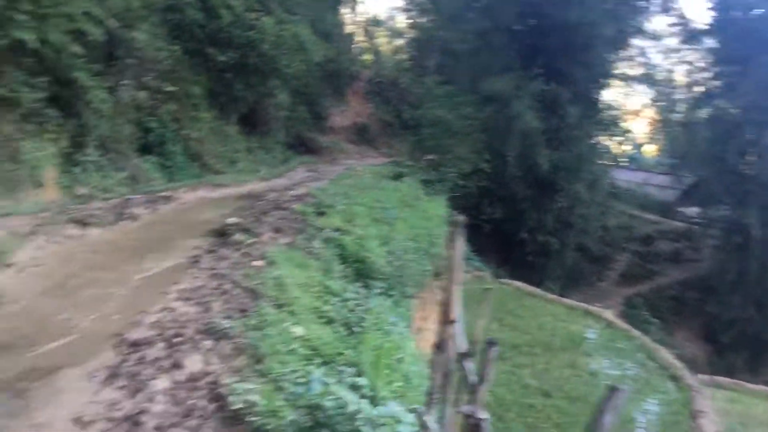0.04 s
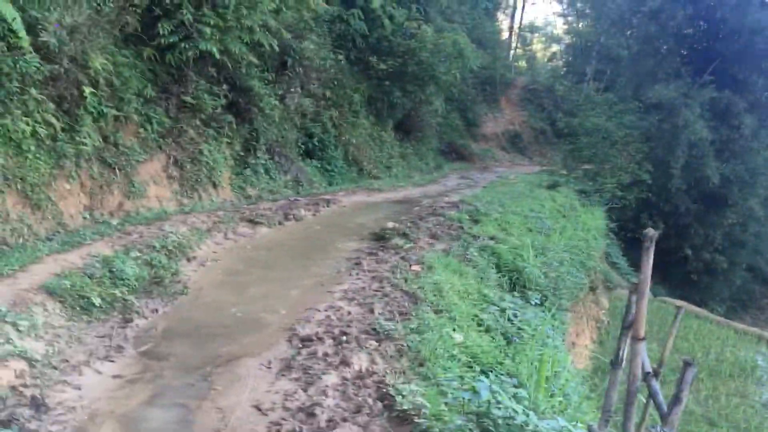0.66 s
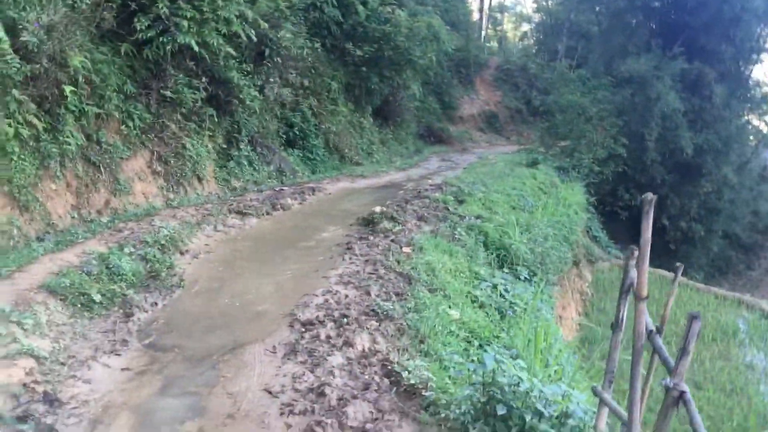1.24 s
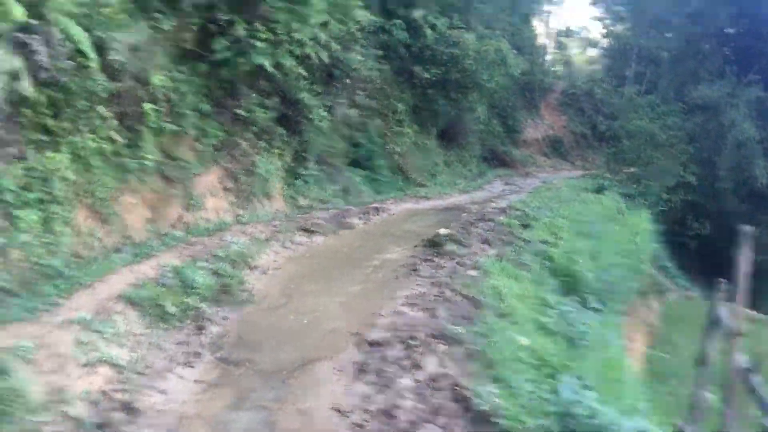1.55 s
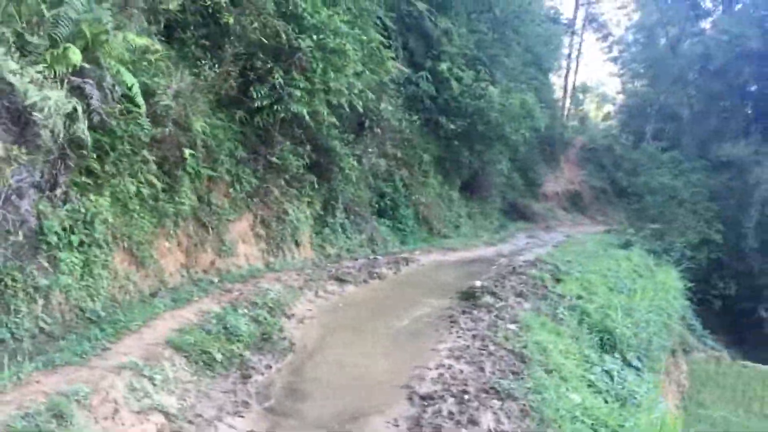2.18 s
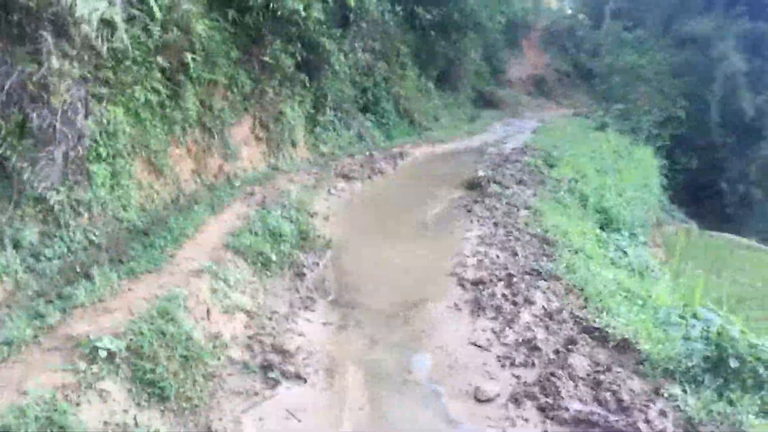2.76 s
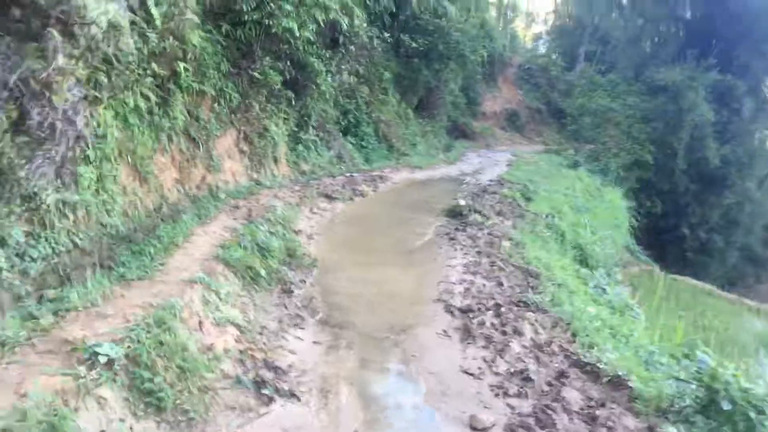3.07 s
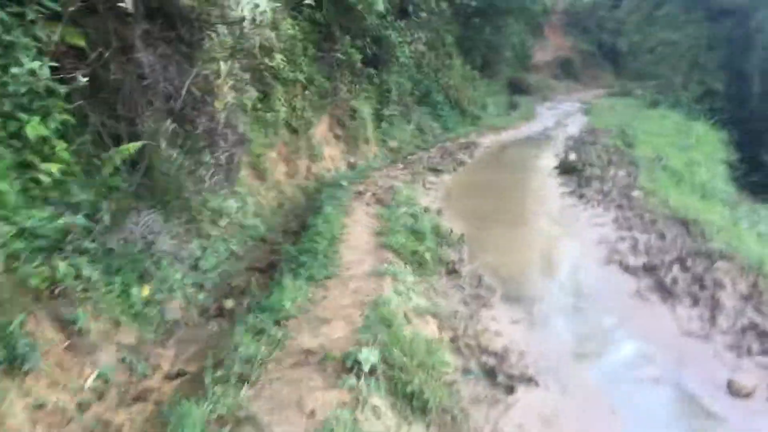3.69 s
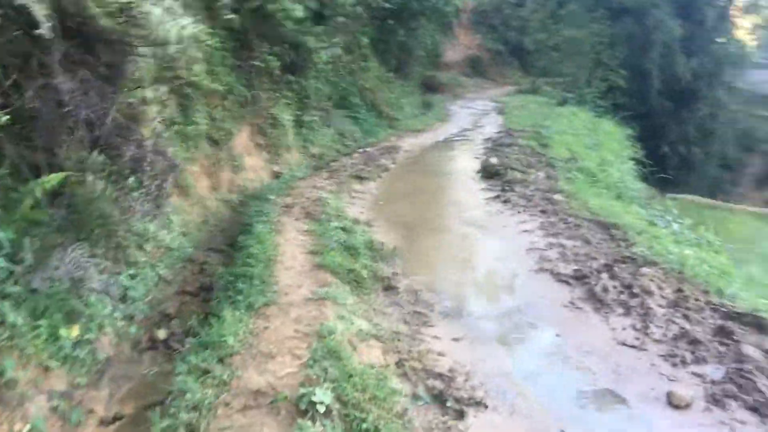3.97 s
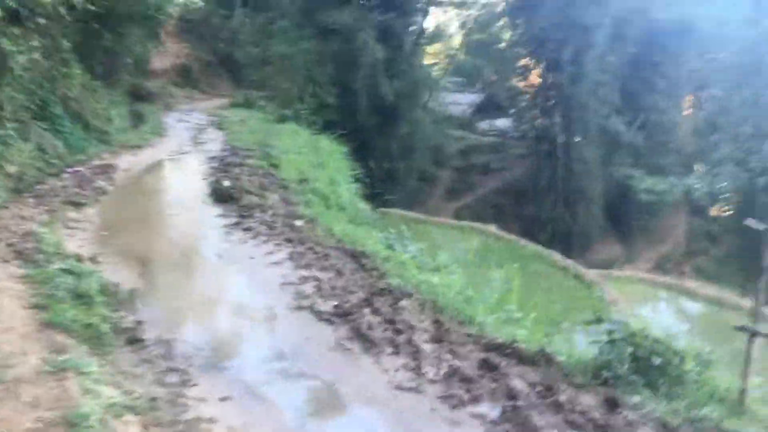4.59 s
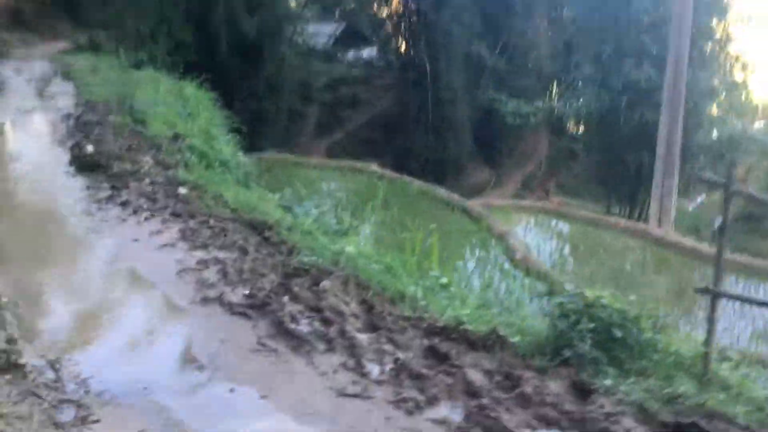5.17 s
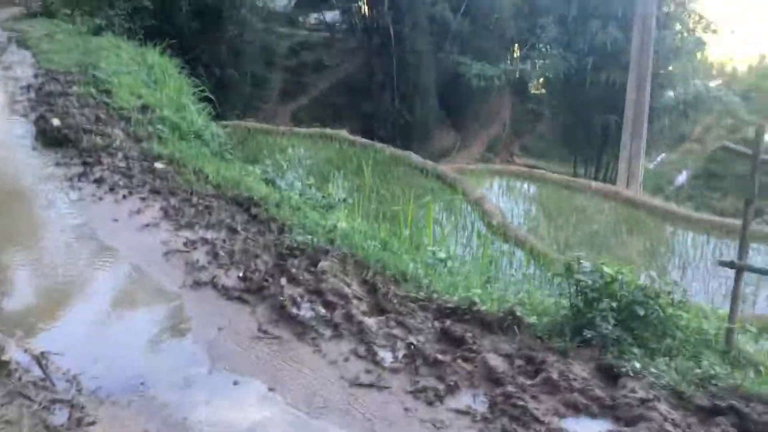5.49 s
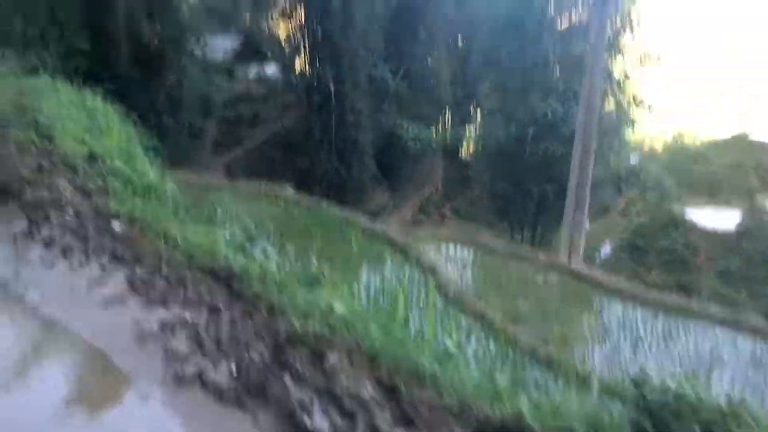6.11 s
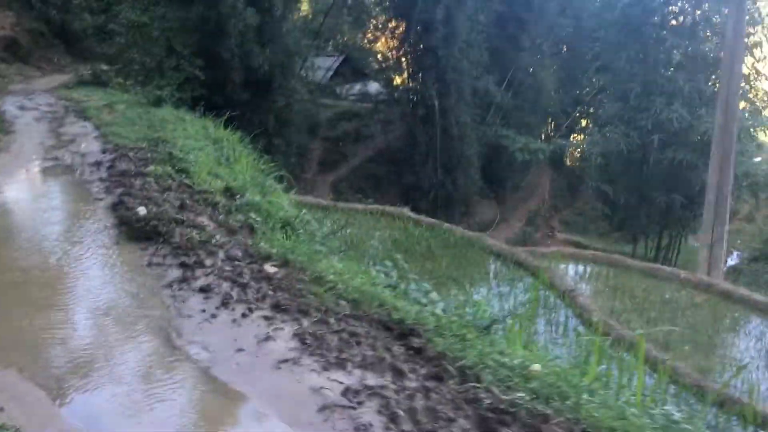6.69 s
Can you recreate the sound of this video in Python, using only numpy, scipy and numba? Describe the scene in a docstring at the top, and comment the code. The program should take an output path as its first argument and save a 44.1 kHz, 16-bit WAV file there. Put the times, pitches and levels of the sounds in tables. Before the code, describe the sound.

A small motorbike passes close at low revs and putters into the distance, while insects sing and feet shift on grass and mud.

```python
"""A single-cylinder four-stroke motorbike passes close on a muddy hillside track, its wet tyres hissing.
Each firing rings the silencer and shakes the engine. As the bike chugs away at low revs, someone by
the track shifts on grass and mud. Then crickets join in, and the slope ahead returns an echo that
comes sooner as the bike rides towards it. Near the end, soft ground hollows out the engine's sound.
All along, far insects sing over trickling water and a breeze puffs on the microphone."""
import sys
import numpy as np
from scipy import signal
from scipy.fft import rfft, irfft, next_fast_len
from scipy.io import wavfile
from scipy.ndimage import uniform_filter1d
from numba import njit

SR = 44100
rng = np.random.default_rng(int(sys.argv[2]) if len(sys.argv) > 2 else 0)


def put_to_file(sound):
    """Save the sound as 16-bit audio at rate SR, in the file named by the first command-line argument."""
    columns = np.atleast_2d(sound).T  # one column per channel
    safe = np.clip(columns, -1, 1)
    whole_steps = np.round(safe * 32767)
    wavfile.write(sys.argv[1], SR, whole_steps.astype(np.int16))


N = 302085
TIME = np.arange(N) / SR

# How fast the engine runs. Each row: time in seconds, firings per second.
FIRING_RATE = [(0.0, 21.17), (0.33, 24.15), (0.6, 24.41), (1.0, 25.19), (1.3, 24.06), (1.55, 24.35),
               (1.8, 22.78), (2.7, 21.04), (3.05, 20.97), (3.65, 21.28), (4.15, 21.07), (4.7, 20.76),
               (5.1, 21.1), (5.5, 22.05), (5.85, 22.93), (6.15, 24.36), (6.55, 23.99), (6.85, 23.97)]
# How loud the exhaust is. Each row: time in seconds, silencer's boom in dB, pipe's bark in dB.
EXHAUST_LEVELS = [(0, -20.5, -32.5), (.3, -20.5, -41.5), (.75, -20.5, -48), (.95, -20, -38.5),
                  (1.5, -21.5, -35.5), (1.95, -24, -42.5), (2.35, -25.5, -45.5), (2.8, -26.5, -45),
                  (3.05, -30.5, -44), (3.35, -31, -42), (3.7, -33.5, -46), (4.1, -30.5, -48),
                  (4.9, -33.5, -48), (5.4, -37, -43), (5.85, -36, -45.5), (6.05, -30, -42.5),
                  (6.5, -30.5, -47.5), (6.85, -36.5, -49.5)]
# Where the silencer's boom is centred. Each row: time in seconds, pitch in Hz.
BOOM_PITCH = [(0, 116), (.8, 126.5), (1.15, 107.6), (2.25, 122), (2.65, 127), (3.35, 127), (4.1, 86),
              (4.9, 98), (5.7, 98.7), (6.15, 122), (6.85, 130)]
# The tone of the engine's clatter. Each row: frequency in Hz, relative level in dB.
CLATTER_TONE = [(120, -4), (250, -5), (380, 10), (520, -2), (700, 0.5), (1000, -4.5), (1200, -5),
                (1800, -3), (2600, -7), (4000, -14), (5000, -17.5), (7000, -17), (10500, -24.5),
                (15000, -24)]
# The notes of the crankcase and cooling fins. Each row: pitch in Hz, width in Hz, relative level in dB.
CASING_NOTES = [(535, 10, 0.5), (848, 30, 1), (960, 37, 0), (1613, 120, -2.5), (2010, 17, -1),
                (2940, 8.2, -8), (3430, 48, -1), (4000, 190, -2), (5380, 350, -7.5)]
# Moments when the casing sings out. Each row: peak time in seconds, fade in seconds, pitch in Hz,
# level in dB.
CASING_SWELLS = [(0.342, 0.085, 814, -43), (0.423, .1, 2010, -45), (.73, 0.012, 4000, -45),
                 (3.48, 0.084, 855, -57), (3.647, 0.15, 1010, -63), (4.853, 0.42, 1027, -64),
                 (5.34, 0.26, 958, -61.5), (6.25, 0.18, 2010, -65)]
# Twigs, wet grit and soft knocks underfoot. Each row: start in seconds, level in dB, pitch in Hz,
# width in Hz, seconds to fade by 60 dB.
FOOT_CRACKS = [(1.654, -42.5, 5800, 7000, 0.015), (1.682, -51, 5200, 3500, 0.019),
               (2.4034, -43.5, 3240, 1580, 0.022), (2.511, -51, 418, 203, 0.019),
               (2.577, -52, 1290, 900, 0.031), (2.754, -56, 4500, 5000, .02),
               (4.299, -45, 1770, 1170, 0.034), (4.339, -51, 2590, 3500, 0.028),
               (4.519, -57, 5600, 2200, .02), (4.582, -50, 406, 220, 0.032),
               (4.5863, -52, 4480, 3500, 0.0086), (4.89, -54, 4000, 5000, 0.017),
               (4.945, -62, 11500, 2800, .03), (5.6923, -41.5, 2350, 1900, 0.0074),
               (5.7406, -52, 2200, 1300, 0.077), (5.835, -51.5, 4000, 5000, 0.018)]
# Grass and clothes brushing. Each row: peak time in seconds, level in dB, rise and fade in seconds.
BRUSHES = [(1.67, -49, 0.022, 0.016), (1.88, -55.5, 0.071, 0.08), (2.41, -49, 0.0094, 0.017),
           (2.45, -57.5, 0.022, 0.074), (3.02, -64.5, 0.077, 0.25), (3.27, -55, 0.013, 0.076),
           (3.43, -57, 0.021, 0.034), (3.6, -59, 0.065, 0.07), (4.32, -57.5, 0.043, 0.044),
           (5.03, -52.5, 0.053, 0.075), (5.705, -55, 0.043, 0.036), (5.84, -65, .015, 0.022),
           (6.32, -51, 0.025, 0.066)]
# The tone of that brushing. Each row: frequency in Hz, relative level in dB.
BRUSH_TONE = [(400, -3), (1200, 15.5), (4000, 10.5), (7000, 9), (10000, 5.5), (13000, 4.5), (16000, 4.5)]
# An insect's short buzzes. Each row: start in seconds, length in seconds, level in dB.
INSECT_BUZZES = [(3.988, 0.12, -67), (5.87, 0.18, -70), (6.44, .18, -69)]
# The tone of the forest and trickling water. Each row: frequency in Hz, relative level in dB.
FOREST_TONE = [(30, -2), (70, 20), (150, 13), (300, 4), (450, -5), (560, 0.5), (700, -1.5), (970, 3),
               (1250, -2.5), (1600, -4.5), (2700, -16), (3700, -5.5), (5200, -17.5), (7600, -10.5),
               (10500, -23.5), (15500, -24)]
# Puffs of air on the microphone. Each row: peak time in seconds, fade in seconds, level in dB.
AIR_PUFFS = [(1.0, .4, -35), (2.354, 0.045, -35), (2.574, .05, -47), (3.3, 0.67, -44), (6.097, 0.3, -48)]

PASSES_S, SPEED_M_S, MISS_M = 0.21, 1.83, 2.35  # when, how fast and how close the bike goes by
IDLE_FIRINGS_PER_S = 21


def engine_cycle():
    """A running count of four-stroke cycles; the engine fires near each whole number."""
    return np.cumsum(curves(FIRING_RATE)[0]) / SR - .12


def above_idle():
    """How many more firings per second the engine makes than at idle."""
    return curves(FIRING_RATE)[0] - IDLE_FIRINGS_PER_S


def nearness():
    """Closest distance over present distance: 1 side-on, falling as the bike rides off."""
    return MISS_M / np.hypot(MISS_M, SPEED_M_S * (TIME - PASSES_S))


def exhaust(cycle, scatter_db=1.01, bark_lead_s=0.0026, bark_echo_db=-10):
    """Each firing's puff of gas makes the pipe bark, the silencer boom and the air thump."""
    boom_db, bark_db = curves(EXHAUST_LEVELS)
    fired = np.flatnonzero(np.diff(np.floor(cycle + 1 / 13)))  # the exhaust valve opens once a cycle
    puffs = np.zeros(N)
    puffs[fired] = undb(scatter_db * rng.standard_normal(len(fired)))
    puffs = cut(puffs, 343.4, "low", order=9)  # the silencer swallows the treble
    echo = slope_echo(puffs)
    boom_width_hz = 42 + 25.5 * nearness()  # the putts are tighter close by
    boom = glide(puffs + echo, curves(BOOM_PITCH)[0], boom_width_hz)
    boom = cut(ring(boom, 109.3, 110), 158, "low", order=2)  # the broad band the silencer lets through
    boom = boom - ring(boom, 180.3, 39.4) - ring(boom, 64.8, 7.2)  # two narrow dips hollow the boom
    # the first rush of gas barks just before the boom; the grassy slope returns less of it
    rush = np.interp(TIME + bark_lead_s, TIME, puffs + undb(bark_echo_db) * echo)
    bark_hz = 262 + 8 * above_idle()
    bark = glide(rush, bark_hz, 0.33 * bark_hz)
    bark = cut(glide(bark, bark_hz + 12, 0.78 * bark_hz), 185, "high", order=4)
    facing = swell(-0.34, np.inf, 0.63, 1)  # the pipe's mouth turns to the listener
    thump_gain = undb(-35 + 1.46 * above_idle()) * facing * nearness() ** 1.23
    thump = thump_gain * steady(double_ring(puffs, 46.9, 22), cycle)
    return undb(boom_db) * steady(boom, cycle) + undb(bark_db) * steady(bark, cycle) - thump


def clatter(cycle, shift_cycles=.05, knock_cycles=.16, tick_cycles=0.031):
    """A knock and a valve tick at each firing, and the churn of chain and tyres, ring the crankcase."""
    behind = 1 - nearness() ** 2
    direct = nearness() * undb(-37 - 22.5 * behind)  # the engine is screened from behind
    gain = np.hypot(direct, undb(-59)) * undb(0.7543 * above_idle())  # trees scatter a little back
    # metal is struck at about the moment of each firing
    since_hit = (cycle + shift_cycles + 1 / 2) % 1 - 1 / 2
    knock = np.exp(-np.abs(since_hit - .03) / knock_cycles) * undb(3 * wander(24))
    churn = undb(5 - 6.5 * swell(PASSES_S, np.inf, 0.4, 1))  # softer once the bike has passed
    shaking = noise() * (knock + churn) * undb(wander(700))
    tick_db = 8.5 + 3 * wander(24)
    tick = noise() * (since_hit > 0) * np.exp(-np.abs(since_hit) / tick_cycles) * undb(tick_db)
    strikes = shaking + 5.3 * tick  # the valve hits metal directly, so it is heard mostly as ringing
    metal = sum(undb(db + 2 * wander(5.3)) * ring(strikes, hz, width) for hz, width, db in CASING_NOTES)
    return gain * steady(colour(shaking + 0.16 * tick + metal, CLATTER_TONE), cycle)


def singing_casing(cycle, depth=0.19):
    """Single notes of the engine's casing stand out for a moment, throbbing with the firings."""
    throb = 1 + depth * np.cos(2 * np.pi * (cycle - .12))
    return throb * sum(undb(db) * bump(peak, fade) * unit(double_ring(noise(), hz, 0.063 * hz))
                       for peak, fade, hz, db in CASING_SWELLS)


def tyre_spray(start_db=-45, fade_db_per_s=13.5):
    """Water and mud fizz off the tyres, fading as they leave the puddle behind."""
    drops = noise() * undb(1.5 * wander(900))
    return undb(start_db - fade_db_per_s * TIME) * unit(ring(drops, 4500, 8400))


def slope_echo(x, full_db=-4.8, midway_s=2.8, rise_s=.45):
    """The slope ahead repeats the sound, sooner and stronger as the bike rides towards it."""
    lag_s = .1398 - .005 * TIME
    gain = undb(full_db) / (1 + np.exp((midway_s - TIME) / rise_s))
    return gain * np.interp(TIME - lag_s, TIME, x)


def soft_ground(x, start_s=4.6, rise_s=0.67):
    """Far down the track, the bounce off grass and mud cancels a band of the engine's sound."""
    return x - swell(start_s, np.inf, rise_s, 1) * ring(x, hz=404, width_hz=190)


def hillside(x, fade_s=0.24, tail_db=-21):
    """Trees and slopes scatter the sound, adding a thin, dull tail."""
    t = TIME[:SR]
    tail = cut(rng.standard_normal(SR), 2100, "low", order=1) * undb(-60 * t / fade_s) * (t > .02)
    return x + undb(tail_db) * signal.fftconvolve(x, tail / np.sqrt(np.sum(tail ** 2)))[:N]


def underfoot():
    """Shifting feet crack twigs and grit, while grass and cloth give grainy brushes."""
    cracks = np.zeros(N)
    t = TIME[:SR // 10]
    for start_s, db, hz, width, fade in FOOT_CRACKS:
        crack = double_ring(rng.standard_normal(len(t)) * undb(-60 * t / fade), hz, width)
        start = int(start_s * SR)
        cracks[start:start + len(t)] += undb(db) * crack / np.std(crack[:SR // 250])
    brushing = sum(undb(db) * np.exp(-np.maximum((peak - TIME) / rise, (TIME - peak) / fade))
                   for peak, db, rise, fade in BRUSHES)
    grains = noise() * undb(1.5 * wander(600))
    return cracks + brushing * colour(grains, BRUSH_TONE)


def insects():
    """A far chorus, a cricket's swelling trill, a lower cricket's chirps and a few short buzzes."""
    chorus = undb(-66 + 0.33 * wander(5.1) + 0.98 * wander(60)) * unit(double_ring(noise(), 6720, 600))
    trill = wing_strokes(50 * TIME + 0.069 * wander(9), hz=7000, fall_hz=750, sounding_share=0.91)
    trill = undb(-60) * swell(2.78, 3.69, 0.73, 0.054) * unit(trill)
    stroke = 49 * TIME + .2 * wander(3.8)
    paired = 1 - .85 * (np.floor(stroke) % 3 == 2)  # every third stroke is weak
    effort = undb(-76) + undb(-73) * swell(2.6, 5.3, 0.32, 0.32)  # always soft, louder for a while
    effort *= undb(1.4 * wander(6.7))
    chirps = effort * unit(paired * wing_strokes(stroke, hz=4100, fall_hz=420, sounding_share=0.71))
    buzzing = sum(undb(db) * (TIME > start) * (TIME < start + length)
                  for start, length, db in INSECT_BUZZES)
    buzzes = uniform_filter1d(buzzing, size=800) * unit(double_ring(noise(), 6380, 200))
    return chorus + trill + chirps + buzzes


def wing_strokes(stroke, hz, fall_hz, sounding_share):
    """Each scrape of a cricket's wing is a short tone that sinks as the wing slows."""
    along = np.minimum(stroke % 1 / sounding_share, 1)
    pitch = hz - fall_hz * (along - 1 / 2) + 70 * wander(400)
    return np.sin(np.pi * along) * np.sin(2 * np.pi * np.cumsum(pitch) / SR)


def forest(level_db=-53):
    """Far water and leaves: the trickle flickers, the high hiss stays nearly even."""
    wash = colour(noise(), FOREST_TONE)
    trickle = cut(wash, 1000, "low", order=1)
    hiss = wash - trickle
    return undb(level_db) * (trickle * undb(1.3 * wander(14)) + hiss * undb(.6 * wander(14)))


def breeze(calm_db=-51.5):
    """Air pushing on the microphone makes a soft, uneven rumble."""
    air = undb(calm_db) + sum(undb(db) * bump(peak, fade) for peak, fade, db in AIR_PUFFS)
    flutter = undb(1.5 * wander(12))
    return air * flutter * unit(cut(double_ring(noise(), 50, 54), 28, "high", order=4))


def undb(db):
    """Turn decibels into a number to multiply by."""
    return 10 ** (np.asarray(db) / 20)


def curves(table):
    """The columns of a table, joined by straight lines in time."""
    times, *columns = np.transpose(table)
    return [np.interp(TIME, times, column) for column in columns]


def swell(start_s, end_s, rise_s, fall_s):
    """Rise from 0 to 1, hold and fall back between two times."""
    return np.clip(np.minimum((TIME - start_s) / rise_s, (end_s - TIME) / fall_s), 0, 1)


def bump(peak_s, fade_s):
    """A smooth hill of height 1, down to about a third at fade_s either side."""
    return np.exp(-((TIME - peak_s) / fade_s) ** 2)


def unit(x):
    """Scale a sound to an average strength (rms) of 1."""
    return x / np.sqrt(np.mean(x ** 2))


def steady(x, cycle):
    """Hold a pulsing sound near strength 1, averaged over three engine cycles."""
    count = cycle - np.floor(cycle[0])
    turn = count.astype(int)
    power = np.bincount(turn, x ** 2) / np.bincount(turn)
    power = uniform_filter1d(power[1:-1], size=3, mode="nearest")
    return x / np.sqrt(np.interp(count, np.arange(len(power)) + 3 / 2, power))


def noise():
    """White noise: an even hiss."""
    return rng.standard_normal(N)


def wander(per_second):
    """A smooth random drift, straying roughly 1 either side of zero."""
    hold = int(SR / per_second)
    steps = np.repeat(rng.standard_normal(N // hold + 1), hold)
    return 1.8 * uniform_filter1d(uniform_filter1d(steps, hold), hold)[:N]


def ring(x, hz, width_hz):
    """A resonance: it keeps one pitch at full strength and weakens those around it."""
    return signal.lfilter(*signal.iirpeak(hz, hz / width_hz, fs=SR), x)


def double_ring(x, hz, width_hz):
    """The same resonance twice, for a sharper band."""
    return ring(ring(x, hz, width_hz), hz, width_hz)


@njit
def glide(x, hz, width_hz):
    """A resonance whose pitch and width can move."""
    y, band, low = np.empty(len(x)), 0., 0.
    for i in range(len(x)):
        tuning, damping = np.tan(np.pi * hz[i] / SR), width_hz[i] / hz[i]
        swing = (band + tuning * (x[i] + 1e-18 - low)) / (1 + tuning * (tuning + damping))
        band, low = 2 * swing - band, low + 2 * tuning * swing
        y[i] = damping * swing
    return y


def cut(x, hz, keep, order):
    """Keep the "low" or "high" side of hz; a higher order cuts more steeply."""
    return signal.sosfilt(signal.butter(order, hz, keep, fs=SR, output="sos"), x)


def colour(x, tone):
    """Shape a sound by a tone table, at strength 1; it falls away below the first row."""
    hz, db = np.transpose(tone)
    size = next_fast_len(N)
    freqs = np.arange(size // 2 + 1) * SR / size + 1
    gain = undb(np.interp(np.log(freqs), np.log(hz), db)) * np.minimum(freqs / hz[0], 1) ** 2
    return unit(irfft(rfft(x, size) * gain, size)[:N])


def scene():
    """The bike on the hillside, with the forest around the listener."""
    cycle = engine_cycle()
    engine = soft_ground(exhaust(cycle) + clatter(cycle))
    bike = hillside(engine + singing_casing(cycle) + tyre_spray())
    return (bike + forest() + insects() + underfoot() + breeze())[None]


def record(dry, bottom_hz=15, top_hz=15750):
    """The phone drops the deepest bass and the highest treble."""
    treble_cut = signal.ellip(10, .2, 70, top_hz, fs=SR, output="sos")
    return signal.sosfilt(treble_cut, cut(dry, bottom_hz, "high", order=2))


dry = scene()
out = record(dry)
put_to_file(out)
```